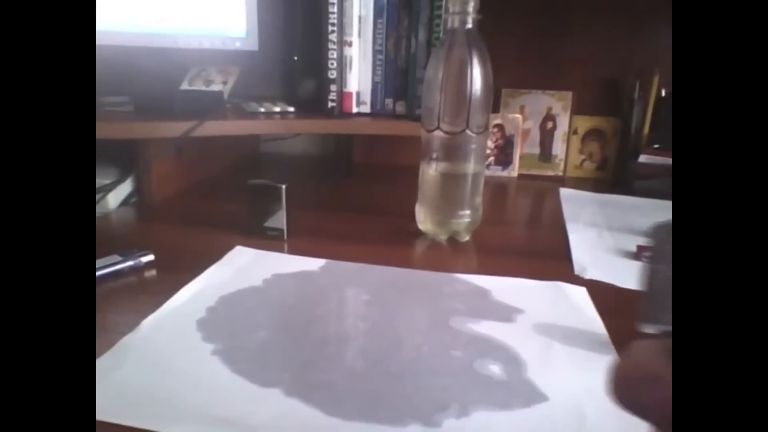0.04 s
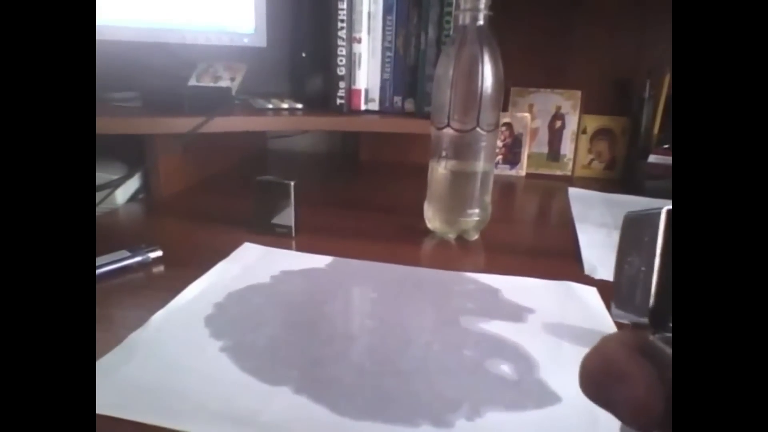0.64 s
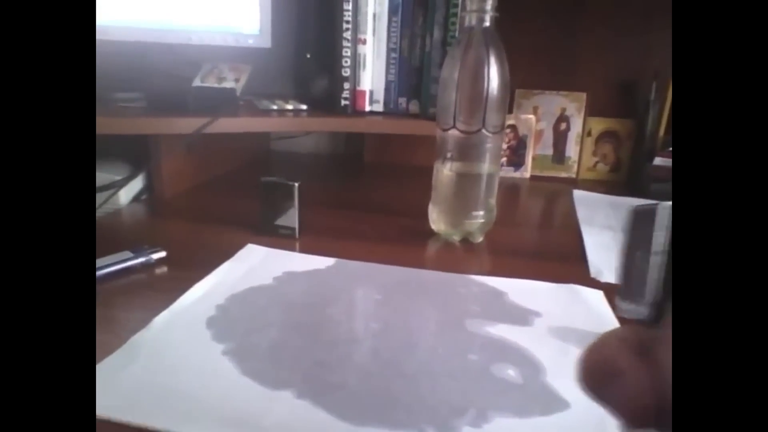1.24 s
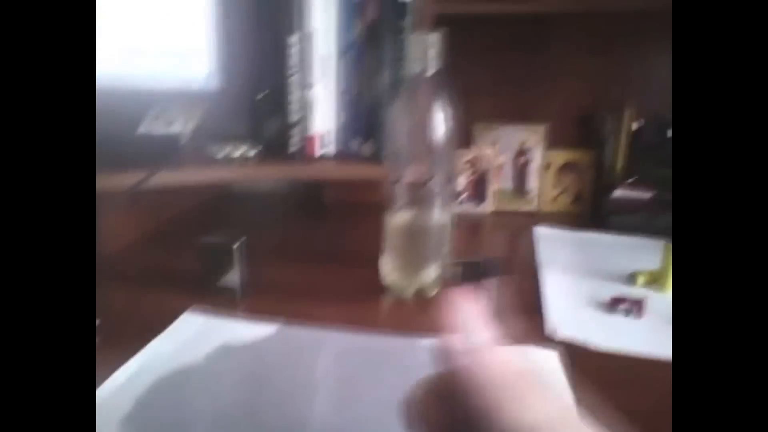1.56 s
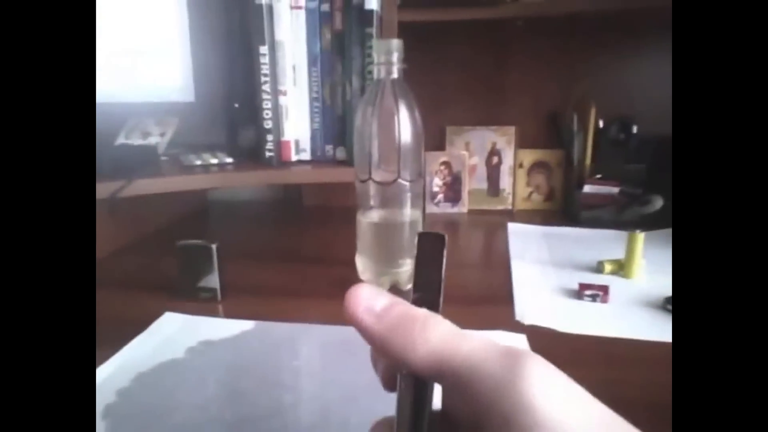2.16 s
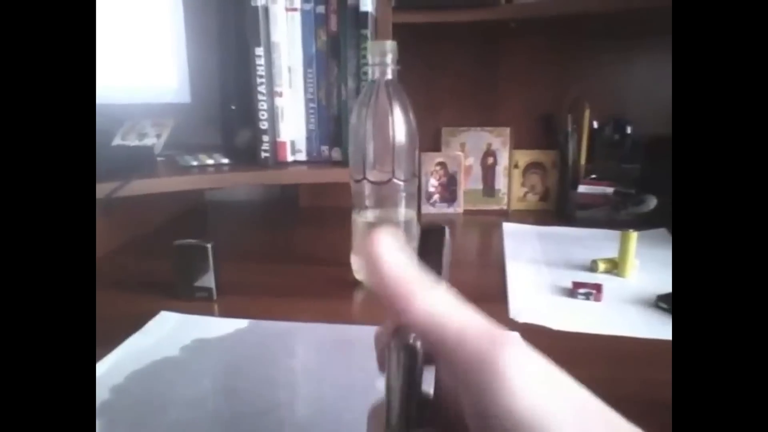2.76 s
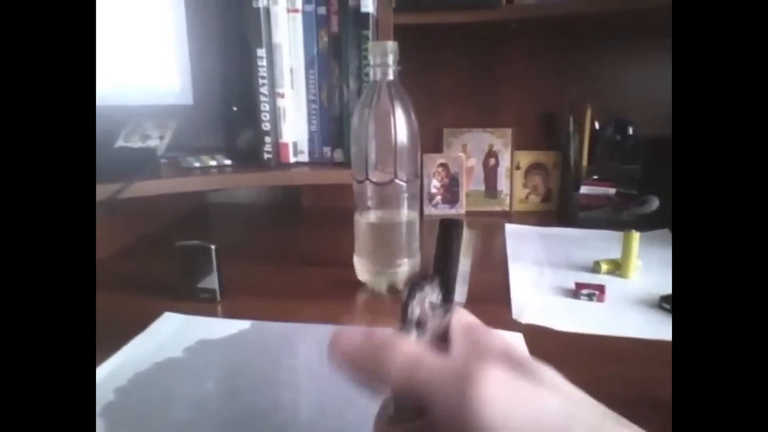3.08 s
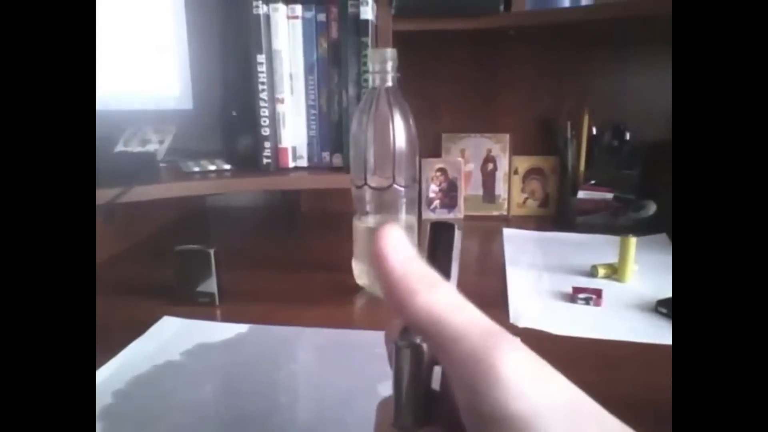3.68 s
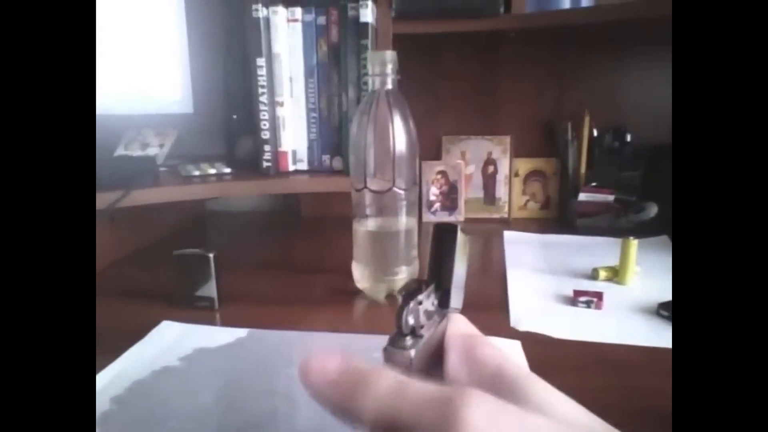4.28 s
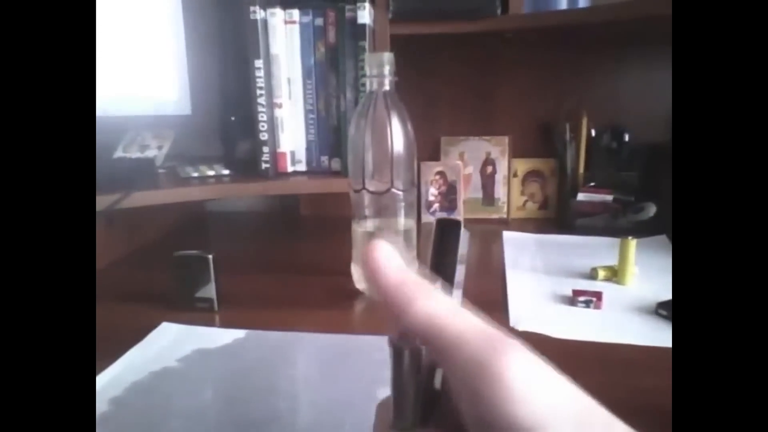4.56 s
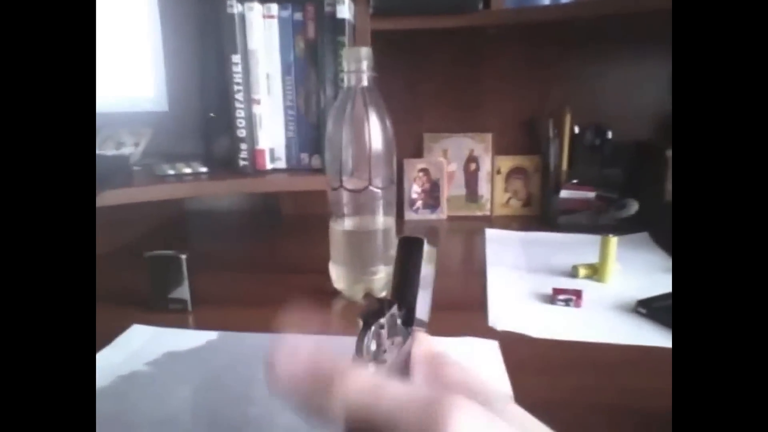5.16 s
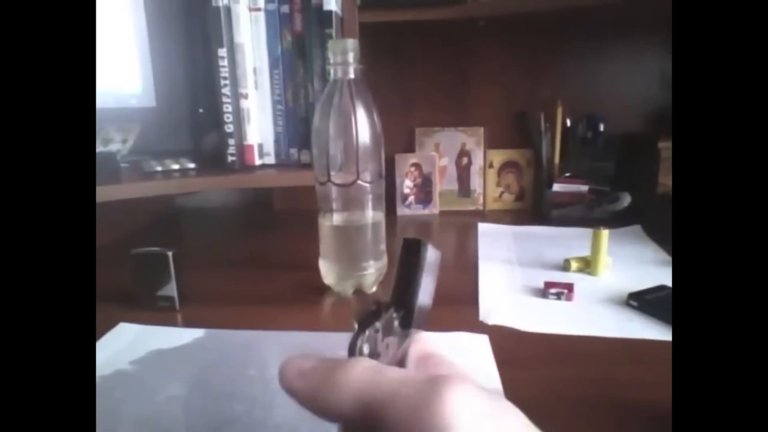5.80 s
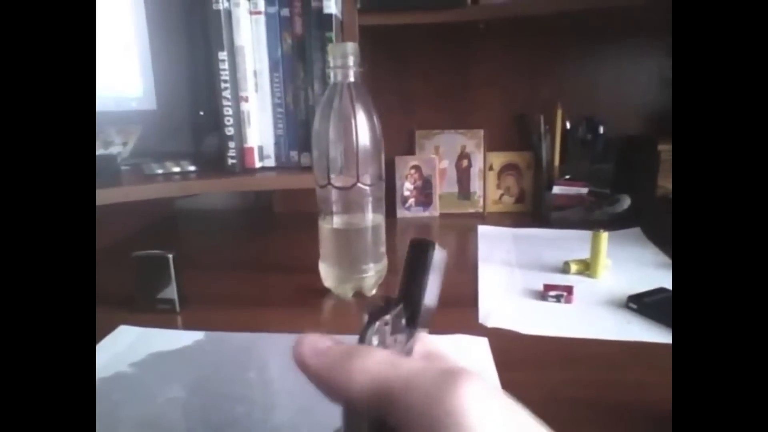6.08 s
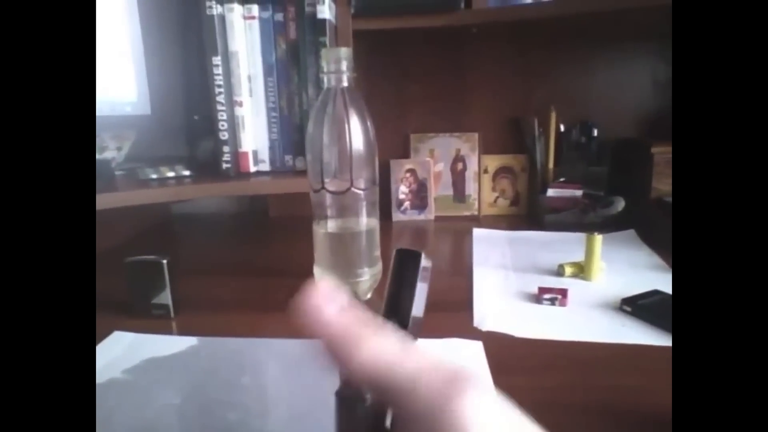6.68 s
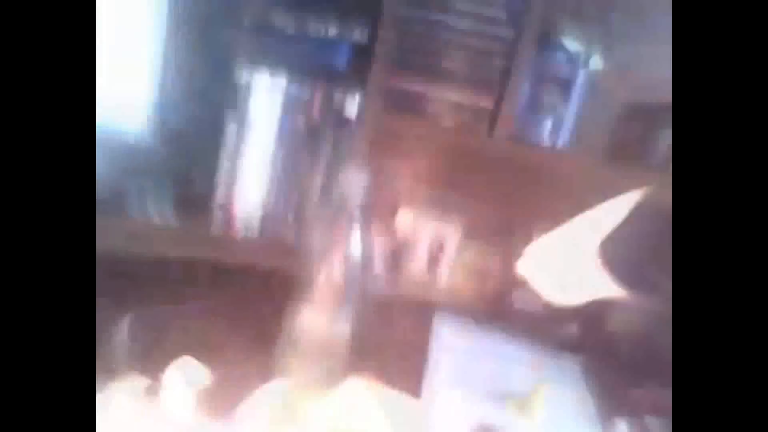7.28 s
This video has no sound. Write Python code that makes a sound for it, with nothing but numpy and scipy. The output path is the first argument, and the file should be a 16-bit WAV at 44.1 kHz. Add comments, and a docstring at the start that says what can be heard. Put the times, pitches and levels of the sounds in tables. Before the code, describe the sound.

After a brief rub of skin on metal, the wheel of a flint lighter scrapes and snaps nine times, the tries coming closer together while the case rings and the loose lid clinks. On the final strike, fuel on paper catches with a deep whoosh, small pops and a rising hiss. Everything is heard up close at a desk in a small room, over the steady hum of a computer fan.

```python
"""A computer fan hums in a small room. At the desk a hand shifts its grip on a metal flint lighter,
then flicks it nine times: the wheel rasps over the flint and snaps free, the case rings, the thumb
thuds and the open lid rattles. The last spark lights fuel spilled on paper, which flares up with
a fluttering roar, puffs of vapour and a growing hiss."""
import sys
import numpy as np
from scipy import signal
from scipy.fft import rfft, irfft, next_fast_len
from scipy.io import wavfile
from scipy.ndimage import uniform_filter1d

SR = 44100
rng = np.random.default_rng(int(sys.argv[2]) if len(sys.argv) > 2 else 0)


def store_pcm(level_fs):
    """Save levels as 16-bit WAV."""
    pcm = np.round(np.clip(level_fs, -1, 1) * 32767).astype(np.int16)
    wavfile.write(sys.argv[1], SR, np.atleast_2d(pcm).T)


N = 323694
TIME = np.arange(N) / SR

# wheel flicks: snap_s, rasp_db, run_up_s, snap_db, ring_db, squeak_hz, climb_db_per_s, thud_db
FLICKS = [(2.3816, -24.5, 0.012, -21, -43, 4980, 700, -50), (3.0809, -22, 0.031, -22, -58, 5100, 700, -41),
          (4.0399, -21.5, 0.037, -21, -38.5, 3150, 1050, -35),
          (4.833, -16, 0.021, -15.5, -32, 4800, 1200, -29.5),
          (5.4965, -20.5, 0.03, -13, -53, 5070, 950, -30.5),
          (5.8131, -18.5, 0.0093, -15, -35, 3950, 1100, -31),
          (6.101, -23.5, 0.033, -23, -45, 3100, 950, -40),
          (6.4342, -18, 0.041, -20.5, -29.5, 4200, 1300, -28.5),
          (6.8697, -18, 0.041, -13, -26, 2690, 1150, -25)]


def from_db(db):
    return 10 ** (np.asarray(db) / 20)


def unit_rms(x):
    return x / np.sqrt(np.mean(x ** 2) + 1e-20)


def at_hz(points, hz):
    """Table lookup on a log-frequency axis."""
    freqs_hz, values = np.transpose(points)
    return np.interp(np.log(np.maximum(hz, 1)), np.log(freqs_hz), values)


def drift(rate_hz):
    """Unit Gaussian knots joined by lines."""
    knots = rng.standard_normal(size=20000)
    return np.interp(TIME * rate_hz, np.arange(len(knots)), knots)


def swell(peak_s, db, sigma_s):
    """Gaussian gain envelope."""
    return from_db(db) * np.exp(-.5 * ((TIME - peak_s) / sigma_s) ** 2)


def colour(x, spectrum):
    """Minimum-phase filter; white noise keeps its power."""
    size = 2 * next_fast_len(N)
    gain = unit_rms(from_db(at_hz(spectrum, np.fft.rfftfreq(size, 1 / SR))))
    cepstrum = irfft(np.log(gain))
    cepstrum[1:size // 2] *= 2
    cepstrum[size // 2 + 1:] = 0
    return irfft(rfft(x, size) * np.exp(rfft(cepstrum)))[:N]


def bell(x, hz, width_hz, db):
    """Lift or cut one band."""
    band = signal.lfilter(*signal.iirpeak(hz, hz / width_hz, fs=SR), x + 1e-18)
    return x + (from_db(db) - 1) * band


def grit(window_samples=32):
    """Fine grains: noise with even power from one millisecond to the next."""
    noise = rng.standard_normal(N)
    return noise / np.sqrt(uniform_filter1d(noise ** 2, window_samples) + 1e-9)


def turbulence(spectrum, window_samples=900):
    """Coloured noise, slow swells evened out; rms 1."""
    noise = colour(grit(), spectrum)
    return noise / np.sqrt(uniform_filter1d(noise ** 2, window_samples) + 1e-9)


def bursts(events, decay_s):
    """One decaying burst of grit per (start_s, level_db)."""
    clicks = np.full(N, 1e-18)
    for start_s, db in events:
        clicks[min(round(start_s * SR), N - 1)] = from_db(db)
    return grit() * signal.lfilter([1], [1, -np.exp(-1 / (decay_s * SR))], clicks)


def strike(modes, times_s, levels_db):
    """Each blow rings every mode at a slightly random strength."""
    out = np.zeros(N)
    onsets = np.round(np.array(times_s) * SR).astype(int)
    scatter_db = rng.standard_normal((len(onsets), len(modes)))
    for k, (hz, db, t60_s) in enumerate(modes):
        clicks = np.full(N, 1e-18)
        clicks[onsets] = from_db(np.array(levels_db) + db + scatter_db[:, k])
        radius, angle = np.exp(-np.log(1000) / (t60_s * SR)), 2 * np.pi * hz / SR
        out += signal.lfilter([0, np.sin(angle)], [1, -2 * radius * np.cos(angle), radius ** 2], clicks)
    return out


def fan(blade_hz=433.2, wander=0.000968, waver_db=0.61, air_db=-47):
    """Blade harmonics, motor whines and air rushing through the housing."""
    harmonics = [(1, -37.5), (2, -57), (3, -59), (4, -71.5), (5, -65.5)]  # blade tone: order, level_db
    motor_tones = [(61.4, -55.5, -1), (248, -63.5, 3), (1486, -56.5, -2)]  # motor: pitch_hz, level_db, waver_db
    air_spectrum = [(20, -10.5), (62, -2.5), (95, -3.5), (160, -4.5), (210, 0.5), (400, -3), (620, -4),
                    (760, -4), (980, -7), (1250, -2.5), (1600, -11.5), (2500, -15), (5500, -23),
                    (8000, -33)]  # airflow: freq_hz, density_db
    housing = [(297.2, 3.1, 7), (409, 60, 6.5), (556, 8.1, 5.5), (638, 25, -7.5), (722, 28, 6.5),
               (775, 14, 5.5), (1132, 86, 2.5), (1644, 90, 2), (1853, 55, 7), (1960, 70, 3)]  # housing bands: centre_hz, width_hz, gain_db
    turns = np.cumsum(blade_hz * (1 + wander * drift(5))) / SR
    blades = sum(from_db(db + waver_db * k * drift(9.7)) * np.sin(2 * np.pi * k * turns)
                 for k, db in harmonics)
    whines = sum(from_db(db + depth_db * drift(10)) * np.sin(2 * np.pi * hz * TIME + 0.14 * drift(13))
                 for hz, db, depth_db in motor_tones)
    air = colour(rng.standard_normal(N), air_spectrum)
    for hz, width_hz, db in housing:
        air = bell(air, hz, width_hz, db)
    return blades + whines + from_db(air_db) * air


def grip(uneven_db=3):
    """Skin slides unevenly over the case; the hand nudges the desk."""
    rubs = [(1.58, -58, -47, 0.033), (1.852, -49, -47.5, 0.022), (5.016, -47, -44, 0.023),
            (5.063, -50, -50, 0.022)]  # grip shifts: peak_s, rustle_db, bump_db, sigma_s
    rustle_spectrum = [(300, -18), (700, 9), (950, -2.5), (1400, 3), (2100, 0), (3100, -4.5), (4300, -16),
                       (5900, -9), (8000, -23), (10000, -18.5), (12500, -28)]  # skin on metal: freq_hz, density_db
    bump_spectrum = [(40, -9), (100, -12), (250, -5.5), (600, 1), (1000, -18), (2000, -46)]  # desk bump: freq_hz, density_db
    slide = sum(swell(s, db, sigma_s) for s, db, _, sigma_s in rubs) * from_db(uneven_db * drift(120))
    nudge = sum(swell(s, db, sigma_s) for s, _, db, sigma_s in rubs)
    return colour(grit() * slide, rustle_spectrum) + nudge * turbulence(bump_spectrum)


def ticks():
    """The wheel and the metal in the hand tick sharply."""
    contacts = [(2.1543, -41), (2.3711, -27), (3.0587, -30), (3.0712, -20.5), (3.9831, -38),
                (4.7928, -31.5), (5.5033, -28), (5.51, -27.5), (6.8247, -34.5), (6.836, -34),
                (6.926, -28.5), (7.148, -35), (7.268, -37), (7.332, -15)]  # metal contacts: start_s, level_db
    spectrum_hz_db = [(500, -11), (2000, 2), (3600, 5.5), (6000, 4.5), (10500, -7), (14000, -5)]
    return colour(bursts(contacts, decay_s=0.00093), spectrum_hz_db)


def wheel(stop_s=0.0046, snap_decay_s=0.00097, teeth_hz=420, teeth_db=4, uneven_db=2, squeak_db=-3):
    """The wheel speeds up, bites the flint harder and brighter, snaps free with a squeak and stops."""
    creeps = [(2.361, -49), (3.996, -44.5), (4.789, -48), (4.802, -48), (6.351, -51), (6.395, -53),
              (6.846, -42)]  # wheel creeps as the thumb takes hold: peak_s, level_db
    rasp_spectrum = [(100, -5.5), (450, -6.5), (1000, -12.5), (1900, -6), (2450, -4.5), (4100, -3),
                     (5000, -2), (6200, 1), (7000, -2.5), (8000, 7), (9000, -2), (10800, -10.5),
                     (13000, -16.5)]  # teeth on flint: freq_hz, density_db
    teeth = np.sin(2 * np.pi * np.cumsum(teeth_hz * np.exp(0.43 * drift(150))) / SR)
    bites = grit() * unit_rms(from_db(teeth_db * teeth + uneven_db * drift(700)))
    dull_bites = signal.sosfiltfilt(signal.butter(1, 5000, fs=SR, output="sos"), bites)
    chips = grit()
    slip = np.exp(0.14 * drift(1800))  # stick-slip pitch wobble
    out = bites * sum(swell(s, db, sigma_s=0.0054) for s, db in creeps)
    for snap_s, rasp_db, run_up_s, snap_db, _, squeak_hz, climb_db_per_s, _ in FLICKS:
        near = abs(TIME - snap_s) < .1
        t = TIME[near] - snap_s
        speed = np.where(t < 0, from_db(climb_db_per_s * t) * (t > -run_up_s), np.exp(-t / stop_s))
        dullness = 0.29 * (1 - speed)
        rasp = from_db(rasp_db) * speed * ((1 - dullness) * bites[near] + dullness * dull_bites[near])
        squeak = from_db(squeak_db) * np.sin(2 * np.pi * np.cumsum(squeak_hz * slip[near]) / SR)
        snap = from_db(snap_db) * np.exp(-abs(t) / snap_decay_s) * (chips[near] + squeak)
        force = np.zeros(N)
        force[near] = rasp + snap
        out += bell(force, squeak_hz, width_hz=1500, db=1)  # flint chatter, pitched by thumb pressure
    return colour(out, rasp_spectrum)


def case(buzz_db=-5):
    """The case rings after each snap, buzzing against its loose insert."""
    modes = [(1916, -14, .1), (2030, -10, .06), (3090, -25, .08), (4554, -18, .09), (5902, 4, .1),
             (5985, -11, .045), (9711, -15, .045), (10096, -3.5, .1)]  # case modes: pitch_hz, level_db, t60_s
    snap_s, _, _, _, ring_db, *_ = np.transpose(FLICKS)
    return strike(modes, snap_s, ring_db) * from_db(buzz_db * drift(450))


def thumb(delay_s=0.0015):
    """The thumb thuds onto the case just after each snap."""
    spectrum_hz_db = [(30, -19), (90, 2.5), (200, -4), (700, -5.5), (1000, -6.5), (1400, -1.5),
                      (4000, -18)]
    thuds = sum(swell(snap_s + delay_s, db, sigma_s=0.0036) for snap_s, *_, db in FLICKS)
    return colour(grit() * thuds, spectrum_hz_db)


def lid(touches=3, gap_s=0.006, loss_db=11, detune=0.0092, buzz_db=3):
    """The loose lid knocks and chatters ever more softly; its pitch shifts with its hinge seating."""
    knocks = [(2.396, -31, -2, -48), (2.44, -40.5, -4, -58), (3.197, -32, -8, -51), (4.048, -28, 8, -42),
              (4.839, -28, -10, -45), (4.869, -41, -4, -56), (5.5031, -34, -7, -48), (5.516, -43, -8, -52),
              (5.821, -38, -1, -50), (5.833, -41, 0, -52), (6.109, -35.5, -3, -49), (6.124, -34.5, -8, -56),
              (6.4418, -24.5, -17, -38), (6.834, -35.5, -1, -43), (6.8693, -25.5, -6, -37)]  # hinge knocks: start_s, ring_db, tilt_db_per_octave, clack_db
    modes = [(1927, 0.5, 0.043), (1990, -14, 0.039), (2430, -6, 0.02), (4570, -15.5, 0.088)]  # lid modes: pitch_hz, level_db, t60_s
    clack_spectrum = [(500, -12), (1400, -8), (2100, 6), (3200, -13), (6000, 2), (12000, -9)]  # lid contact: freq_hz, density_db
    ring, contacts = 0, []
    for start_s, ring_db, tilt_db_per_octave, clack_db in knocks:
        gaps_s = gap_s * rng.uniform(.5, 1.5, touches)
        times_s = start_s + np.cumsum(gaps_s) - gaps_s[0]
        losses_db = loss_db * np.arange(touches)
        shift = 1 + detune * rng.standard_normal()
        seated_modes = [(hz * shift, db + tilt_db_per_octave * np.log2(hz / modes[0][0]), t60_s)
                        for hz, db, t60_s in modes]
        ring += strike(seated_modes, times_s, ring_db - losses_db)
        contacts += zip(times_s, clack_db - losses_db)
    ring *= from_db(buzz_db * drift(300))
    return ring + colour(bursts(contacts, decay_s=0.0021), clack_spectrum)


def fire(catch_s=0.0088, flare_s=7.295, flare_rise_s=0.011, flare_db=7, spread_db_per_s=50.5):
    """The last spark lights the fuel: roar and deep surge follow the blaze, hiss grows as it spreads."""
    blaze = [(6.87, -43), (6.895, -30), (6.915, -28), (6.96, -33), (6.995, -19), (7.03, -27.5),
             (7.075, -42), (7.108, -35), (7.14, -44), (7.162, -27), (7.178, -30), (7.206, -27.5),
             (7.272, -37), (7.304, -29), (7.34, -29)]  # blaze strength: time_s, level_db
    roar_spectrum = [(20, -16), (45, -18), (90, 0.5), (140, 0), (210, -0.5), (330, -7), (550, -17),
                     (800, -22), (1100, -23), (2000, -34), (5000, -72)]  # flame roar: freq_hz, density_db
    surge_spectrum = [(20, -30), (34, -7), (54, 0.5), (88, 5.5), (140, -17.5), (210, -7.5), (400, -38),
                      (1000, -72)]  # deep surge: freq_hz, density_db
    hiss_spectrum = [(200, 8), (600, 10.5), (1200, -8), (2500, -0.5), (4000, -6), (6000, -3.5), (8000, -9),
                     (10500, -13), (14000, -27)]  # flame hiss: freq_hz, density_db
    age_s = np.maximum(TIME - FLICKS[-1][0], 0)
    lit = 1 - np.exp(-age_s / catch_s)
    flare = np.clip((TIME - flare_s) / flare_rise_s, 0, 1)  # the whole spill goes up
    strength_db = np.interp(TIME, *np.transpose(blaze))
    strength_db -= strength_db.max()
    roar = turbulence(roar_spectrum) * from_db(-24 + 0.53 * strength_db)
    roar *= from_db(3 * drift(130))  # flutter
    surge = turbulence(surge_spectrum) * from_db(-12 + 1.37 * strength_db)
    hiss_db = -59 + spread_db_per_s * age_s + flare_db * flare
    sizzle = grit() * from_db(hiss_db + 1.5 * drift(370))
    flame = lit * (roar + surge + colour(sizzle, hiss_spectrum)) + puffs()
    return signal.sosfilt(signal.butter(2, 30, "high", fs=SR, output="sos"), flame)


def puffs(suction_db=-15, suction_delay_s=0.0039):
    """Vapour pockets catch: a pointed pressure pulse, a softer suction, a flapping, throbbing flame."""
    pockets = [(6.911, -13, 0.00042, -29), (6.982, -8, 0.00059, -21), (6.9945, -4, 0.00036, -24),
               (6.998, -11.5, 0.00039, -29), (7.106, -21, 0.0013, -28.5), (7.1265, -18, 0.00065, -38),
               (7.1566, -15, 0.00065, -25), (7.1621, -14, 0.00081, -45), (7.19, -13.5, 0.00086, -39),
               (7.2027, -8, 0.0011, -40), (7.213, -10.5, 0.00038, -25.5), (7.229, -13, 0.00042, -29),
               (7.296, -14, .0005, -27), (7.302, -22, 0.00057, -20.5), (7.3154, -12, 0.00057, -20)]  # ignitions: peak_s, pulse_db, decay_s, flap_db
    flap_spectrum = [(150, -26), (350, -16), (550, 11), (800, 8.5), (1200, -18), (2400, -13.5), (5000, -65)]  # flame flap: freq_hz, density_db
    throb = (120, 18, 6.6)  # flame pulsation: centre_hz, width_hz, gain_db
    pulses = sum(from_db(db) * np.exp(-np.minimum(abs(TIME - s) / decay_s, 50))
                 for s, db, decay_s, _ in pockets)
    suction = sum(swell(s + suction_delay_s, db + suction_db, sigma_s=0.0016) for s, db, *_ in pockets)
    flaps = colour(bursts([(s, db) for s, *_, db in pockets], decay_s=0.004), flap_spectrum)
    return bell(pulses - suction, *throb) + flaps


def diffuse(samples, block=512):
    """Noise in blocks of flat spectrum and random phase."""
    spectra = rfft(rng.standard_normal((samples // block + 1, block)))
    return irfft(spectra / abs(spectra)).ravel()[:samples]


def room(x, gap_s=0.0009, build_s=0.00076, desk_db=2, desk_s=0.005):
    """Dense reflections from desk, shelves and walls, dying band by band."""
    decay = [(200, 0.26), (2000, 0.22), (5000, 0.27), (11000, 0.3)]  # reverberation: freq_hz, t60_s
    t = np.arange(SR // 2) / SR
    noise, tail = diffuse(len(t)), 0
    edges_hz = np.geomspace(100, 16000, 9)
    for low, high in zip(edges_hz, edges_hz[1:]):
        band = signal.sosfiltfilt(signal.butter(2, [low, high], "band", fs=SR, output="sos"), noise)
        tail += band * np.exp(-np.log(1000) * t / at_hz(decay, np.sqrt(low * high)))
    tail *= 1 + from_db(desk_db) * np.exp(-t / desk_s)  # the desk answers first and loudest
    tail *= 1 - np.exp(-np.maximum(t - gap_s, 0) / build_s)
    return signal.fftconvolve(x, tail / np.sqrt(np.sum(tail ** 2)))[:N]


def scene(hand_send_db=-11, case_send_db=-19, fire_send_db=-16):
    """Lighter and fire close by, with their room, over the fan."""
    chimney = [(3370, 240, 6), (4920, 320, 2.5)]  # lighter chimney, colours the direct sound: centre_hz, width_hz, gain_db
    hand = ticks() + thumb() + wheel() + lid() + grip()
    ring, blaze = case(), fire()
    send = from_db(hand_send_db) * hand + from_db(case_send_db) * ring + from_db(fire_send_db) * blaze
    echoes = room(send)
    for hz, width_hz, db in chimney:
        hand = bell(hand, hz, width_hz, db)
    return (hand + ring + blaze + fan() + echoes)[None]


def record(dry, gain_db=-4.5, cutoff_hz=14110):
    """Small microphone with a hollow in its treble; the top is cut."""
    response = [(20, 1), (45, -1.5), (5800, 0.5), (6800, -4), (7500, -13.5), (8200, -22), (8900, -9.5),
                (9800, 0), (11000, 1.5), (12000, -3), (13000, -7), (14000, -34)]  # microphone: freq_hz, gain_db
    heard = from_db(gain_db) * colour(dry[0], response)[None]
    return signal.sosfilt(signal.ellip(8, .2, 80, cutoff_hz, fs=SR, output="sos"), heard)


dry = scene()
out = record(dry)
store_pcm(out)
```